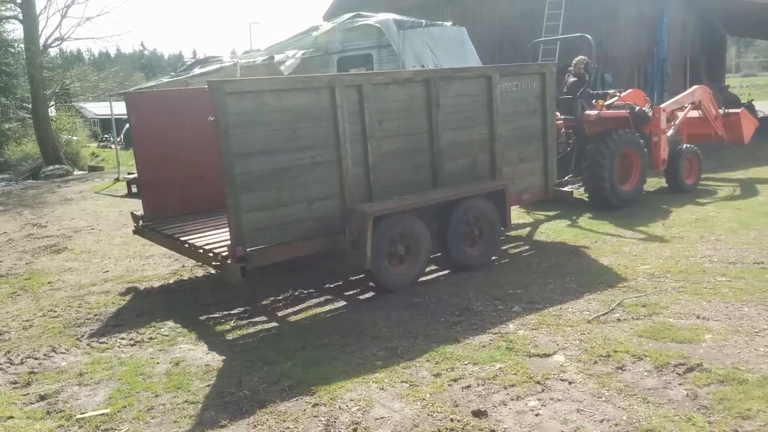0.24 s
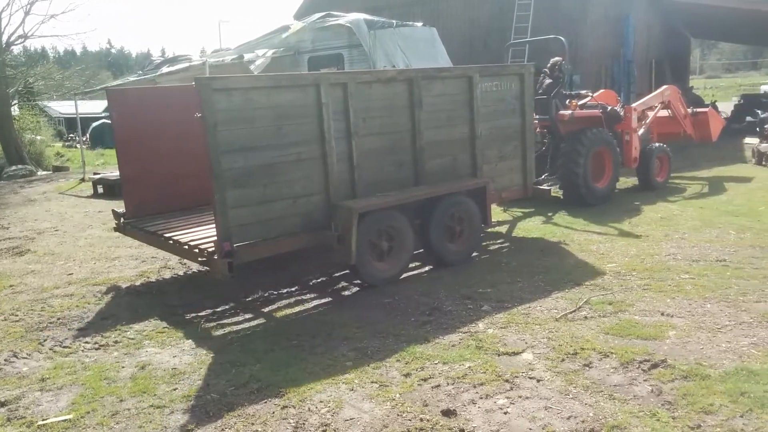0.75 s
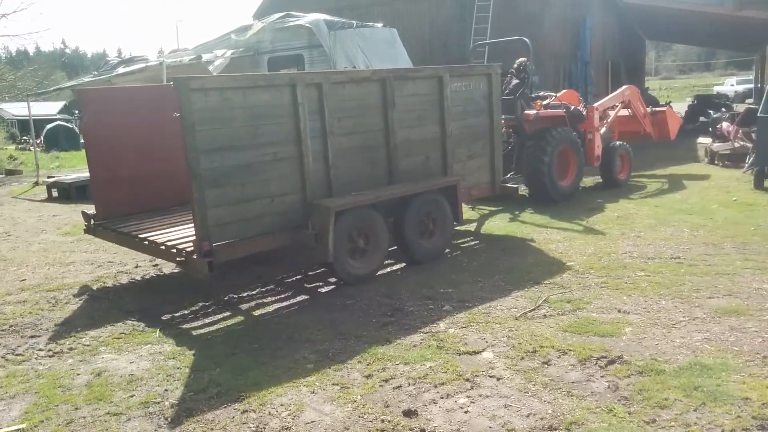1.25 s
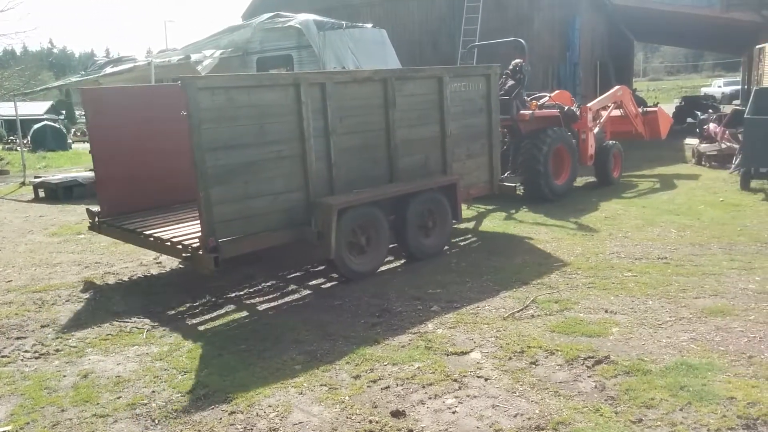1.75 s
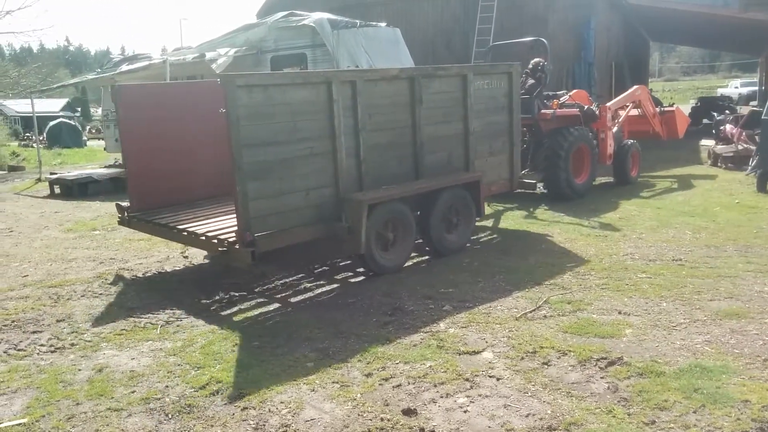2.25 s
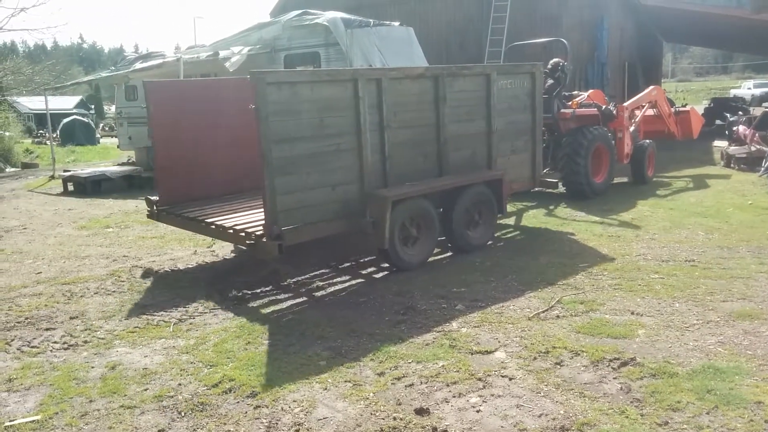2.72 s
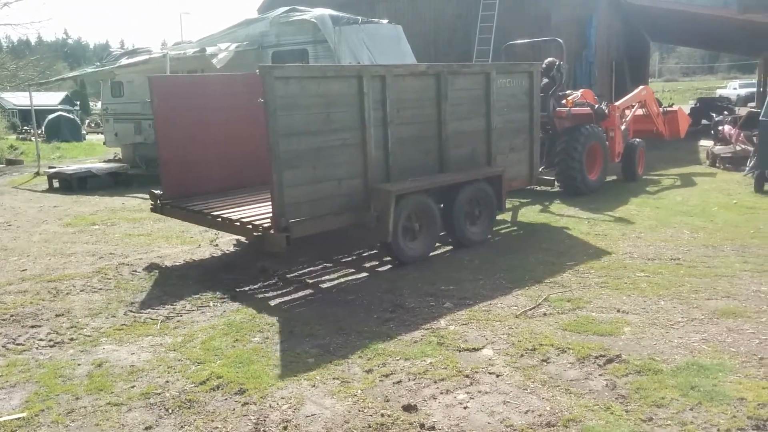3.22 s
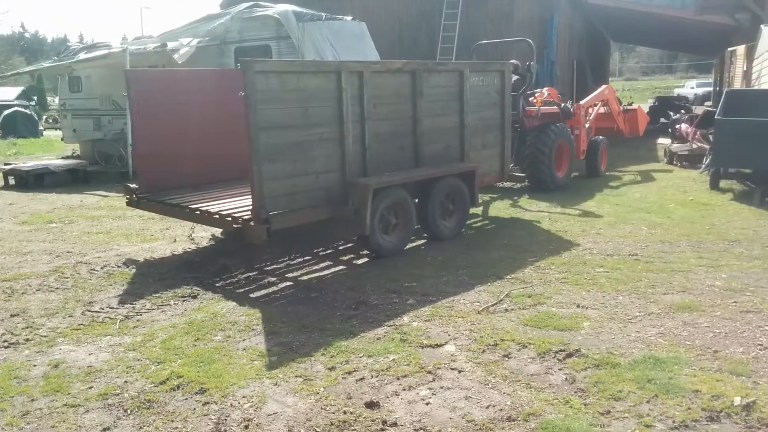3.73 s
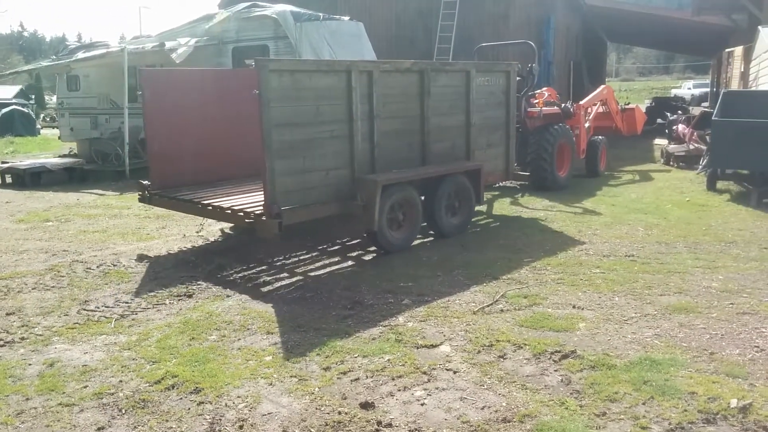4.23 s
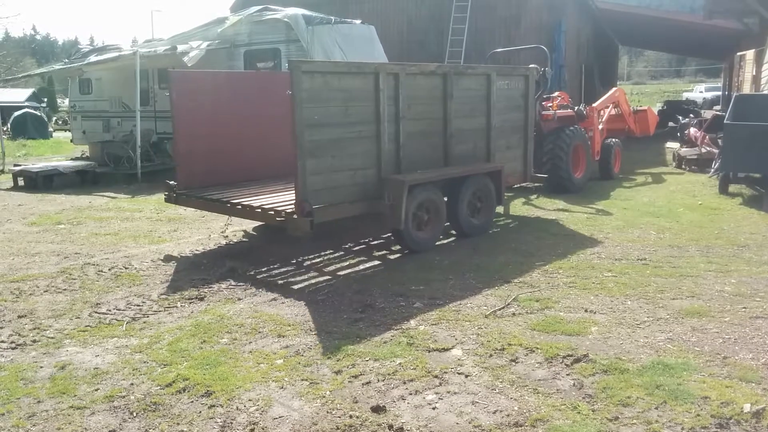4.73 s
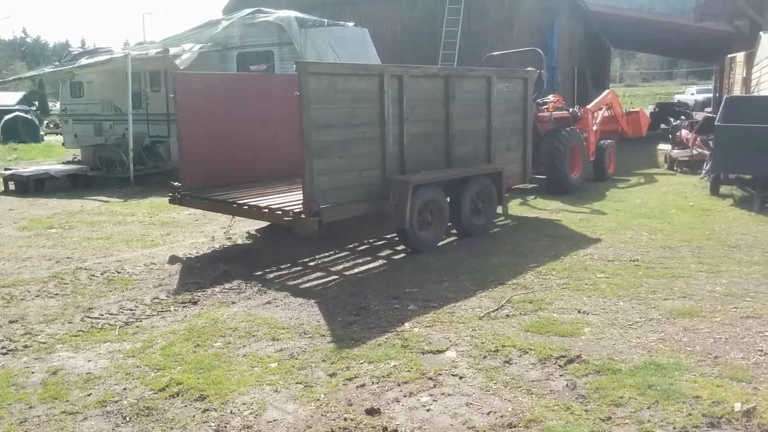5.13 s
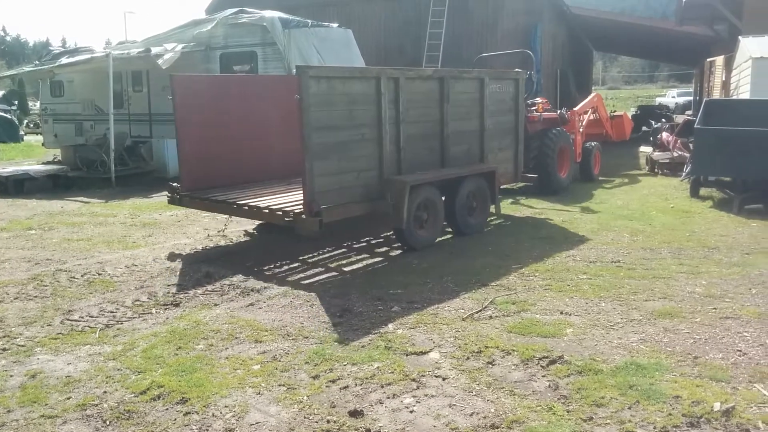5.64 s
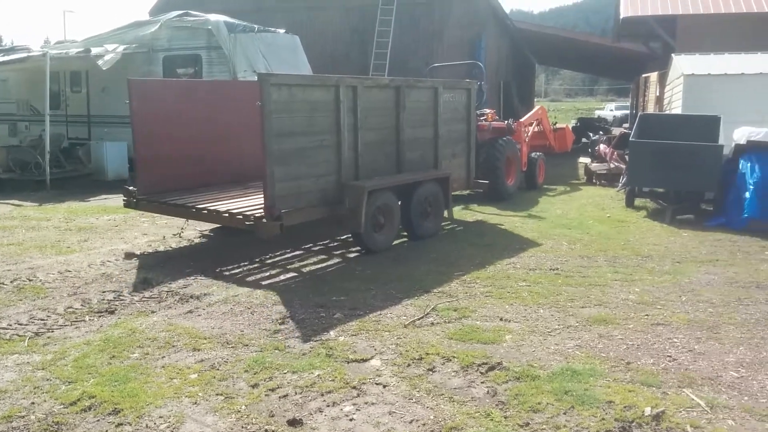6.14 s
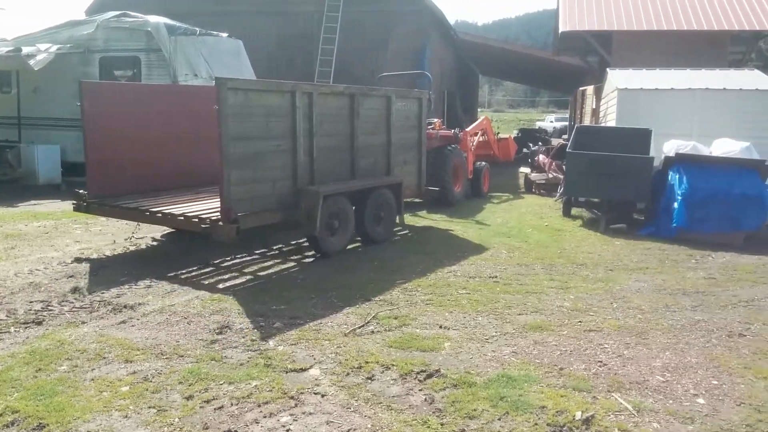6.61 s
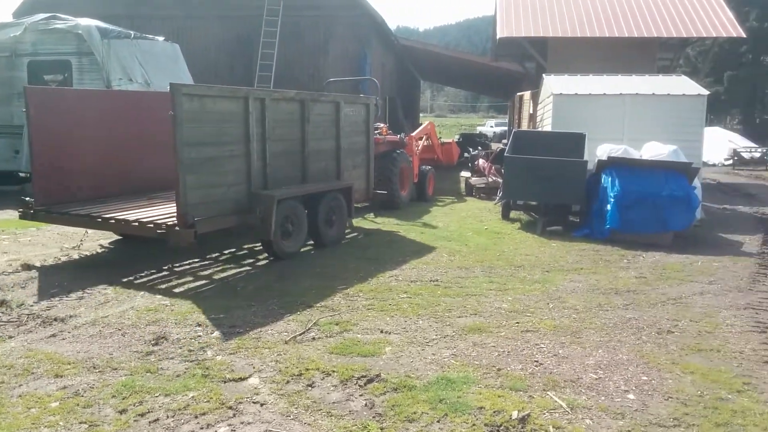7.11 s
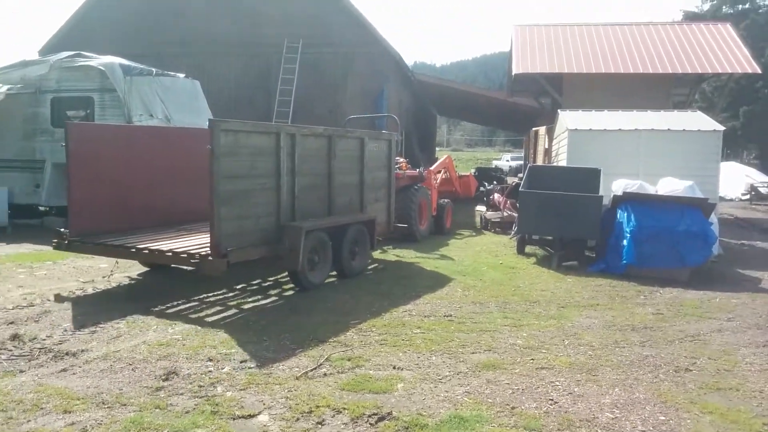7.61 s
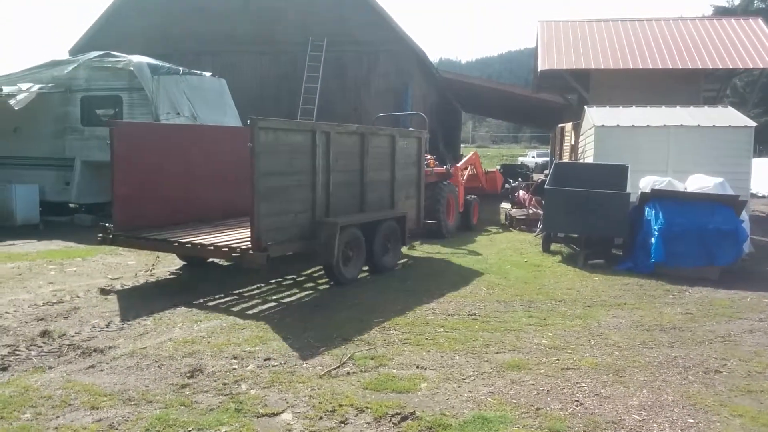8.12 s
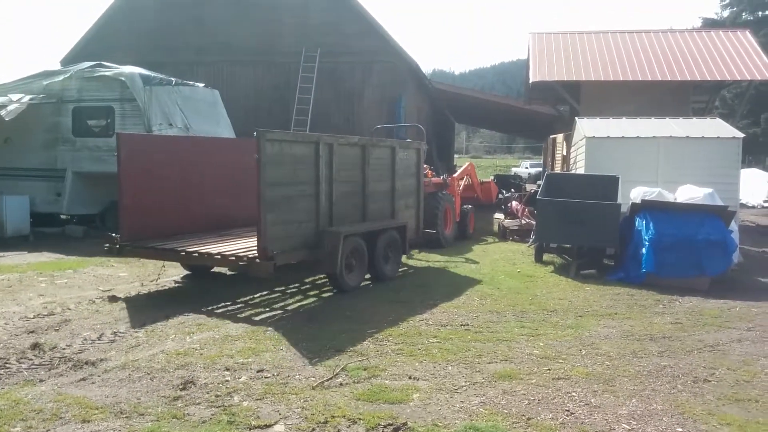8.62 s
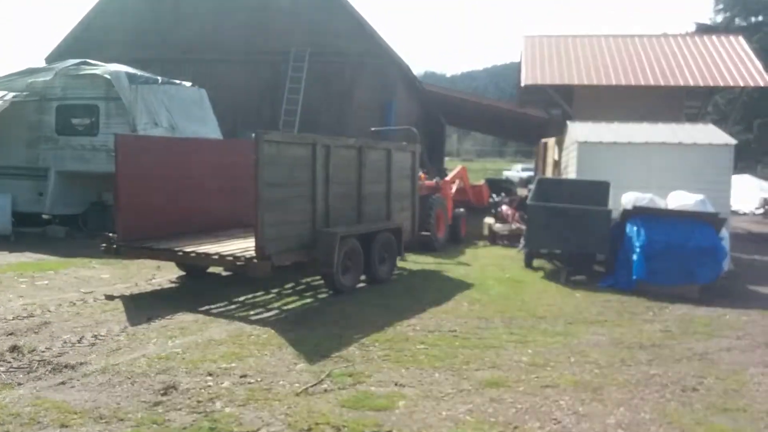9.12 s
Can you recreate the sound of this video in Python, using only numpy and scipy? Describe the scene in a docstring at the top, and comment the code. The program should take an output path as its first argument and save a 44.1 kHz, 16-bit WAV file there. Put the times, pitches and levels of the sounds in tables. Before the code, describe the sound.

A small three-cylinder diesel tractor chugs at low revs across a farmyard, clattering and whining, with dull handling knocks close to the microphone.

```python
"""Compact diesel tractor in a farmyard

A three-cylinder tractor at low revs backs a trailer, heard across the yard from a hand-held camera.
Uneven exhaust puffs ring a pipe over a hum; shaped noise makes the block's clatter, rattle and ticks.
The belt-driven fan whines in groups of fluttering sine tones that fade in and out.
At the microphone, decaying case modes and noise swells make dull knocks and rubs, over a faint hiss.
Late on, a finger partly covers the microphone and muffles the tractor."""
import sys
import numpy as np
from scipy import signal
from scipy.fft import rfft, irfft, next_fast_len
from scipy.io import wavfile
from scipy.ndimage import uniform_filter1d, map_coordinates

SR = 44100
rng = np.random.default_rng(int(sys.argv[2]) if len(sys.argv) > 2 else 0)


def dump(signal):
    """Clip the signal to [-1, 1] and save it as 16-bit WAV at the path in sys.argv[1]."""
    limited = np.clip(np.atleast_2d(signal).T, -1, 1)
    pcm = np.round(limited * 32767).astype(np.int16)
    wavfile.write(sys.argv[1], SR, pcm)


N = 412776  # samples, 9.36 s


def amp(db):
    """Decibels to gain."""
    return 10 ** (np.asarray(db) / 20)


def unit(x):
    """Scale to rms 1."""
    return x / np.sqrt(np.mean(x ** 2) + 1e-20)


def curves(rows):
    """Straight lines between table rows: one curve for each column after the time."""
    s, *columns = np.transpose(rows)
    return [np.interp(np.arange(N) / SR, s, column) for column in columns]


def bumps(rows):
    """A sum of bell curves from (t/s, sigma/s, height) rows."""
    t = np.arange(N) / SR
    return sum(height * np.exp(-.5 * ((t - s) / sigma) ** 2) for s, sigma, height in rows)


def wobble(rate):
    """A smooth random curve with the given number of knots a second."""
    return map_coordinates(rng.standard_normal(4096), [np.arange(N) * rate / SR], mode="mirror")


def filtered(x, response):
    """Multiply the spectrum of x by a response, with room for the tail."""
    size = next_fast_len(N + SR // 2)
    return irfft(rfft(x, size) * response(np.fft.rfftfreq(size, 1 / SR)), size)[:N]


def equalised(x, points):
    """Filter x by a gain curve through (f/Hz, gain/dB) points."""
    hz, db = np.transpose(points)
    return filtered(x, lambda f: amp(np.interp(np.log(f + 1), np.log(hz), db)))


def noise(spectrum, drive=None):
    """White noise, or the given drive, coloured by a spectrum; rms 1."""
    drive = rng.standard_normal(N) if drive is None else drive
    return unit(equalised(drive, spectrum))


def patchy(x, width_hz, length_s, depth_db):
    """Random patches of gain in time and frequency make a sound uneven; rms 1."""
    hz, t, cells = signal.stft(x, SR, nperseg=512)
    field = rng.standard_normal(cells.shape)
    for axis, span in enumerate([width_hz / hz[1], length_s / t[1]]):
        for _ in range(2):
            field = uniform_filter1d(field, max(1, round(span)), axis)
    return unit(signal.istft(cells * amp(depth_db * unit(field)), SR, nperseg=512)[1][:N])


def add(track, s, sound):
    """Mix a sound into a track from time s on."""
    part = track[round(s * SR):][:len(sound)]
    part += sound[:len(part)]


# Engine speed: t/s, rate/four-stroke cycles per second
CYCLE_RATE = [(0, 13.708), (1.6, 13.704), (2.75, 13.723), (3.6, 13.942), (4.6, 13.822), (5.5, 13.541),
              (6, 13.676), (7.2, 13.643), (8, 13.697), (8.4, 13.603), (8.8, 13.711), (9.36, 13.768)]


def crankshaft():
    """The engine's speed adds up to its position, counted in four-stroke cycles."""
    return np.cumsum(curves(CYCLE_RATE)[0]) / SR


# Gas puffs within one cycle: position/share of the cycle, mean level/dB
PUFFS = [(0.174, -10.5), (0.329, 1), (0.666, -3), (0.843, 1.5), (0.991, -4.5)]
# Exhaust pipe resonances: f/Hz, width/Hz, level/dB
PIPE_MODES = [(184.6, 21.4, 4.5), (286, 8.9, -19), (320, 8.6, -25.5), (490, 450, -19.5)]
# Exhaust levels: t/s, firing tone level/dB, octave level before trim/dB, throb level/dB
EXHAUST_LEVELS = [(0, -67, -40.5, -35), (1.2, -63.5, -48.5, -41), (1.85, -60, -47, -38),
                  (2.7, -60.5, -52, -42.5), (3.7, -48.5, -45, -38), (4.5, -56, -63, -48.5),
                  (5.2, -55, -59.5, -51.5), (5.48, -51, -44, -43.5), (6.9, -48.5, -42, -39),
                  (7.7, -56, -47, -43.5), (8.1, -57, -52, -52), (8.65, -58, -51.5, -52.5),
                  (9.36, -63, -52.5, -51.5)]


def exhaust(turns):
    """Unequal puffs ring the pipe; the firing rate and its overtones hum along."""
    firing_db, octave_db, throb_db = curves(EXHAUST_LEVELS)
    puffs, cycles = np.zeros(N), np.arange(-1, int(turns[-1]) + 1)
    for share, db in PUFFS:
        at = np.searchsorted(turns, cycles + share)
        at = at[(at > 0) & (at < N)]
        puffs[at] += amp(db + 1.2 * rng.standard_normal(len(at)))

    def pipe(f):
        """Each mode passes a band of its own width."""
        return sum(amp(db) * 1j * f * w / (c * c - f * f + 1j * f * w) for c, w, db in PIPE_MODES)

    def muffler(f):
        """Losses below 70 Hz and above 500 Hz."""
        return (1j * f / (70 + 1j * f)) ** 2 / (1 + 1j * f / 500) ** 3

    # the gas flow peaks once a cycle, around the two closest puffs
    stroke = np.cos(2 * np.pi * (turns - .96))
    flow = amp(1.2 * stroke + 5.5 * np.exp(9 * (stroke - 1)))
    ringing = filtered(puffs, lambda f: pipe(f) * muffler(f))
    ringing = patchy(ringing, width_hz=100, length_s=0.02, depth_db=2.5)
    throb = amp(throb_db) * unit(flow * ringing)

    firing = 2 * np.pi * 3 * turns  # phase, three firings a cycle
    sixth = np.sin(6 * firing + .5 * wobble(2))
    octave = np.cos(2 * firing) + amp(-8.5) * flow * sixth
    hum = amp(firing_db) * np.sin(firing) + amp(octave_db + 4.5) * octave
    third = amp(-55 + 5.1 * wobble(3)) * np.sin(3 * firing)
    return throb + hum + third


def machinery(turns, repeat):
    """Dense contacts, of which a share recurs at the same crank angle in every cycle."""
    size = int(N / turns[-1])  # mean samples per cycle
    pattern = rng.standard_normal(SR)[(turns % 1 * size).astype(int)]
    share = np.clip(repeat, 0, 1)
    return np.sqrt(share) * pattern + np.sqrt(1 - share) * rng.standard_normal(N)


# Ring of a combustion tick: f/Hz, level/dB per Hz
TICK_SPECTRUM = [(200, -22), (600, 2.5), (900, 0), (1300, -1.5), (1700, -12), (2500, -14.5), (3100, -34.5),
                 (5000, -52.5)]
TICK_DECAY_S = 0.0049  # time for the drive to fall to 1/e


def ticks(turns):
    """Each firing cracks sharply in the block, with a random strength."""
    count, phase = np.divmod(3 * (turns + 1), 1)
    since_s = phase / (3 * curves(CYCLE_RATE)[0])
    strength = amp(2.5 * rng.standard_normal(1024))[count.astype(int)]
    burst = strength * np.exp(-since_s / TICK_DECAY_S) * rng.standard_normal(N)
    return noise(TICK_SPECTRUM, burst)


# Block levels before trim: t/s, clatter level/dB, injector rattle level/dB
BLOCK_LEVELS = [(0, -46.5, -62.5), (2.4, -47, -59.5), (3.5, -49.5, -66.5), (5.2, -48.5, -63.5),
                (6.3, -48, -65.5), (7.7, -48, -65.5), (8.3, -51.5, -68.5), (9.36, -51, -66)]
# Spectrum of the clatter: f/Hz, level/dB per Hz
CLATTER_SPECTRUM = [(25, -29), (55, -6), (120, 2.5), (240, 6.5), (380, -6), (540, 2), (610, -2),
                    (780, -3.5), (880, -11), (990, -2), (1250, -26.5), (1400, -14.5), (1650, -23),
                    (3500, -80)]
# Spectrum of the injector rattle: f/Hz, level/dB per Hz
RATTLE_SPECTRUM = [(1200, -24), (1650, -4), (1850, -3), (2100, -1.5), (2550, -1), (2850, -9), (3100, -19),
                   (3500, -22.5), (3850, -19), (4200, -33), (7000, -74)]
# Air hiss of the engine: f/Hz, level/dB per Hz
AIR_SPECTRUM = [(2500, -19), (4300, -1), (5800, -2.5), (7500, -7), (10000, -13.5), (15000, -33.5)]
# Arrival of each firing's sound from the block: t/s, lag/cycles
FIRING_LAG = [(3, -.04), (5.5, .09)]
# Brief dips in the tractor's treble: t/s, sigma/s, depth in the block's sound/dB
TREBLE_DIPS = [(1.45, 0.018, 5.5), (2.66, 0.063, 2.5), (3.24, 0.079, 6), (4.27, 0.17, 4),
               (4.71, 0.088, 5.5), (7.07, 0.079, 1), (8.06, 0.083, 4)]
DIP_ABOVE_HZ = 460  # the block's sound well below this keeps its level


def block(turns):
    """Each firing shakes the block, whose panels rattle in lumps; one cylinder is loudest."""
    clatter_db, rattle_db = curves(BLOCK_LEVELS)
    heard = turns - curves(FIRING_LAG)[0]
    firing = np.cos(2 * np.pi * 3 * heard)
    lope = np.cos(2 * np.pi * (turns - .04))
    clatter_drive = machinery(turns, repeat=0.39) * amp(1.58 * firing + 1.3 * lope)
    rattle_drive = machinery(turns, repeat=0.23) * amp(firing + 1.3 * lope)
    clatter = patchy(noise(CLATTER_SPECTRUM, clatter_drive), width_hz=350, length_s=.012, depth_db=2.0)
    rattle = patchy(noise(RATTLE_SPECTRUM, rattle_drive), width_hz=600, length_s=.012, depth_db=3.0)
    # reflections off the ground and the trailer shift slowly and colour the sound
    clatter = patchy(clatter, width_hz=160, length_s=0.12, depth_db=2.0)
    rattle = patchy(rattle, width_hz=200, length_s=0.048, depth_db=4.0)
    air = amp(clatter_db - 38 + .8 * firing) * noise(AIR_SPECTRUM)
    tick = amp(clatter_db - 10) * ticks(heard + .015)
    sound = amp(clatter_db + 4) * clatter + amp(rattle_db + 2) * rattle + tick + air
    bass = filtered(sound, lambda f: 1 / (1 + (f / DIP_ABOVE_HZ) ** 6))
    return bass + amp(-bumps(TREBLE_DIPS)) * (sound - bass)


# Fan lines in groups that fade together: f/multiple of the fan shaft rate, mean relative level/dB
LOW_LINES = [(8, -14), (11, -7), (17, -18), (18, 13.5), (19, -12.5)]
LOWER_MID_LINES = [(23, -9.5), (24, -0.5)]
MID_LINES = [(27, -6), (28, -6), (29, -5.5), (30, 3), (31, -3.5)]
UPPER_LINES = [(35, -1.5), (36, -4), (37, 0.5), (38, -5), (39, -4)]
HIGH_LINES = [(47, -14.5), (48, -7), (49, -2), (54, -11), (66, -19)]
# Group levels before trim and dips, by blade harmonic, the last the top whistle: t/s, level/dB
THIRD_LEVEL = [(0, -51), (1.2, -55), (2.4, -44.5), (3.5, -51.5), (4.5, -46), (5.15, -44.5), (5.5, -51.5),
               (6.2, -42.5), (6.8, -41), (7.05, -55.5), (7.4, -46), (8.3, -64), (9.36, -73)]
FOURTH_LEVEL = [(0, -51.5), (1.1, -50), (1.45, -61.5), (3.6, -56), (5.1, -59.5), (6.2, -55.5), (7.6, -52.5),
                (8.2, -59), (9.36, -57)]
FIFTH_LEVEL = [(0, -40.5), (.62, -53.5), (.85, -48.5), (2.15, -49), (2.35, -43), (2.9, -48.5), (3.4, -62),
               (3.8, -47.5), (4.6, -61.5), (5.25, -44), (5.6, -50.5), (6.27, -48.5), (6.44, -62),
               (6.8, -46), (7.05, -60), (8.3, -68), (8.62, -54.5), (9.36, -62)]
SIXTH_LEVEL = [(0, -52.5), (1.2, -59), (1.85, -54.5), (3, -70), (3.75, -52), (4.5, -63.5), (5.75, -55),
               (6.45, -76), (6.8, -61), (7.7, -63), (8.1, -80), (8.35, -54.5), (8.7, -80)]
WHISTLE_LEVEL = [(0, -51.5), (1.2, -56), (2.5, -66.5), (5.6, -63.5), (6.6, -58.5), (7.7, -56.5), (8.4, -69),
                 (9.36, -56.5)]
# Flares of the top whistle: t/s, sigma/s, gain/dB
WHISTLE_FLARES = [(2.05, 0.34, 15.5), (2.91, 0.065, 18.5), (4.76, .22, 18)]
BELT_RATIO = 3.1135  # fan shaft turns per four-stroke cycle
FAN_DIP = 2.26  # the fan's lines dip this many times deeper than the block's treble


def fan(turns, smear=0.83, rough=0.39):
    """Blade harmonics and shaft sidebands, each fluttering in the turbulent air."""
    shaft = 2 * np.pi * BELT_RATIO * turns + 0.0047 * wobble(25)
    dip_db = FAN_DIP * bumps(TREBLE_DIPS)
    firing = np.cos(2 * np.pi * 3 * (turns - curves(FIRING_LAG)[0]))
    low_db = curves(THIRD_LEVEL)[0] - dip_db - 3
    lower_mid_db = curves(FOURTH_LEVEL)[0] - dip_db - 3.5
    mid_db = curves(FIFTH_LEVEL)[0] - dip_db + 0.55 * firing - .3
    upper_db = curves(SIXTH_LEVEL)[0] - dip_db - 5
    high_db = curves(WHISTLE_LEVEL)[0] + bumps(WHISTLE_FLARES) - 1.02 * dip_db - 7
    groups = [(LOW_LINES, low_db), (LOWER_MID_LINES, lower_mid_db), (MID_LINES, mid_db),
              (UPPER_LINES, upper_db), (HIGH_LINES, high_db)]
    whine = np.zeros(N)
    for lines, level_db in groups:
        tones = np.zeros(N)
        for multiple, db in lines:
            flutter = amp(2.2 * wobble(9))
            tones += amp(db) * flutter * np.sin(round(multiple) * shaft + smear * wobble(22))
        whine += amp(level_db) * unit(tones * (1 + rough * wobble(110)))
    return whine


# Spectrum of the background hiss: f/Hz, relative level/dB
HISS_SPECTRUM = [(30, 6), (1000, 4), (4500, 2), (6500, 1.8), (9000, .3), (15500, 0)]


def hiss():
    """Steady coloured noise lies faintly underneath."""
    return amp(-80.4) * noise(HISS_SPECTRUM)


# Knocks on the camera: t/s, level before trim/dB,
# thump level before trim/dB, crack level before trim/dB, top f/Hz
KNOCKS = [(0.724, -21.5, -4, -1, 910), (2.5143, -14, -30, 0.5, 1300), (4.4044, -12.5, -33, 1, 1320),
          (7.694, -20.5, 5, -24, 700), (7.709, -28.5, -10, 6.5, 1430), (7.759, -16, -24, -18, 600),
          (7.777, -13, -18, -22, 600), (7.821, -20, -12, -18, 710), (7.849, -21.5, -9, -21, 1010),
          (8.372, -20, 1, -21, 800), (8.418, -14, -27, -24, 550), (8.46, -15, 0.5, -18, 1200),
          (8.8034, -1, -4.5, -10, 2920)]
# Camera body modes: mean f/Hz, mean level/dB, t60/s
BODY_MODES = [(134, -15, 0.084), (190, -20.5, 0.095), (263, -21, 0.037), (294, 6, 0.012),
              (419, -2.5, 0.015), (746, -8, 0.011), (2060, -26, 0.0056)]


def knocks(thump_hz=72, thump_t60=0.11):
    """A blow gives one sharp push, a short ring of the case and a low thump; soft contact dulls it."""
    track, t = np.zeros(N), np.arange(SR // 3) / SR
    u = t / .0003
    push = u * (2 - u) * np.exp(-u)
    soft_start = 1 - np.exp(-t / 0.0011)
    for s, db, thump_db, crack_db, top_hz in KNOCKS:
        ring = np.zeros(len(t))
        for hz, level, t60 in BODY_MODES:
            decay = amp(level + rng.normal(0, 1) - 60 * t / t60)
            ring += decay * np.sin(2 * np.pi * hz * rng.normal(1, .04) * t)
        thump = amp(thump_db - 7.5 - 60 * t / thump_t60) * np.sin(2 * np.pi * thump_hz * t)
        crack = amp(crack_db + 6.5) * push
        contact = signal.butter(N=5, Wn=top_hz, fs=SR, output="sos")
        add(track, s, amp(db - 3.5) * signal.sosfilt(contact, soft_start * ring - thump - crack))
    return track


# Fingers rubbing the case: t/s, sigma/s, level/dB
RUBS = [(4.343, 0.0046, -35), (4.417, 0.0086, -29), (7.652, 0.0045, -34.5), (7.783, 0.11, -43),
        (7.896, 0.097, -48), (8.163, 0.015, -36.5), (8.379, 0.03, -33.5), (8.465, 0.015, -30.5),
        (8.809, 0.028, -34.5)]
# Spectrum of a rub: f/Hz, level/dB per Hz
RUB_SPECTRUM = [(20, -47), (40, -26), (100, 1), (330, -2), (550, -4), (900, -25.5), (2500, -32.5),
                (4500, -65.5), (9000, -65.5), (15000, -87)]


def rubs():
    """Short swells of skin sliding on the case; the last and hardest knock trails a faint sizzle."""
    t = np.arange(N) / SR

    def swell(s, sigma, db):
        """A bell curve of gain."""
        return amp(db) * np.exp(-.5 * ((t - s) / sigma) ** 2)

    skin = patchy(noise(RUB_SPECTRUM), width_hz=260, length_s=.012, depth_db=3.0)
    sizzle = noise([(3000, -27), (7500, -2), (10000, -9), (14000, -19)])
    return sum(swell(*row) for row in RUBS) * skin + swell(8.84, 0.04, -78) * sizzle


# Gain under a finger on the microphone: f/Hz, gain/dB
COVER_GAIN = [(40, -9), (85, -9), (200, 0), (500, -2.5), (800, -14), (1300, -7), (1700, -7), (2600, -14),
              (6000, -10)]
COVER_S, COVER_FADE_S = 8.86, 0.023  # middle and length of the fade, after the last knock


def covered(x):
    """A finger settles over part of the microphone and muffles the sound."""
    muffled = equalised(x, COVER_GAIN)
    share = np.clip((np.arange(N) / SR - COVER_S) / COVER_FADE_S + .5, 0, 1)
    return x + share * (muffled - x)


def scene():
    """The crankshaft drives every engine sound; handling and hiss join at the microphone."""
    turns = crankshaft()
    tractor = covered(exhaust(turns) + block(turns) + fan(turns))
    handling = knocks() + rubs()
    return (tractor + handling + hiss())[None]


def record(dry):
    """The camera keeps nothing above its band limit of 15720 Hz."""
    return filtered(dry[0], lambda hz: hz < 15720)[None]


dry = scene()
out = record(dry)
dump(out)
```